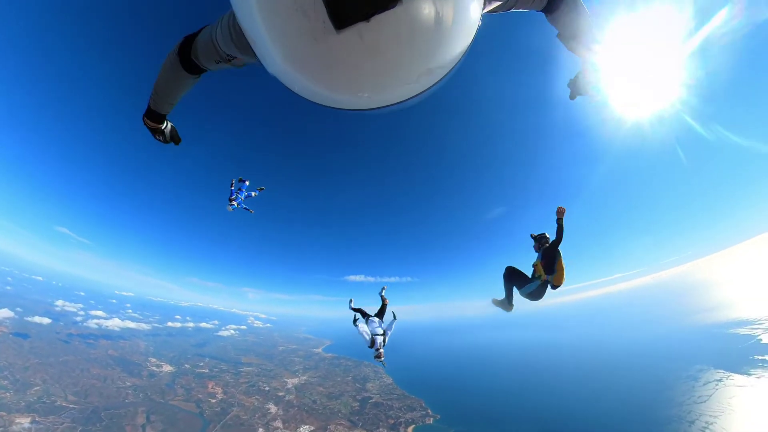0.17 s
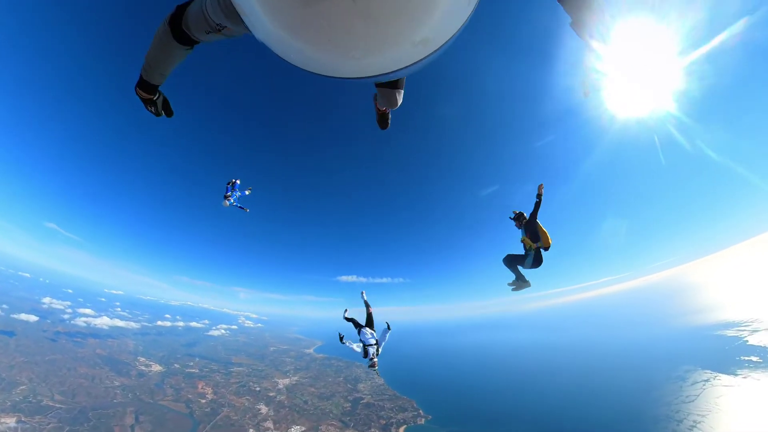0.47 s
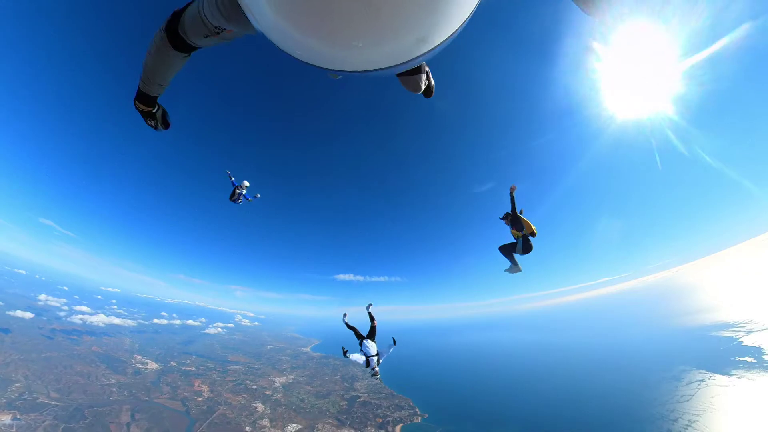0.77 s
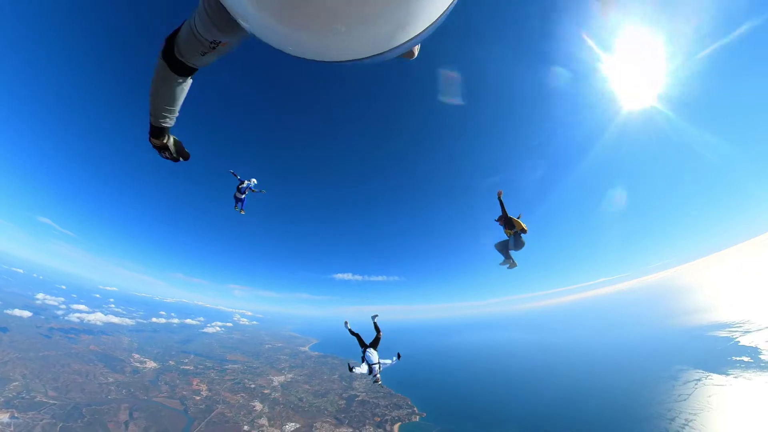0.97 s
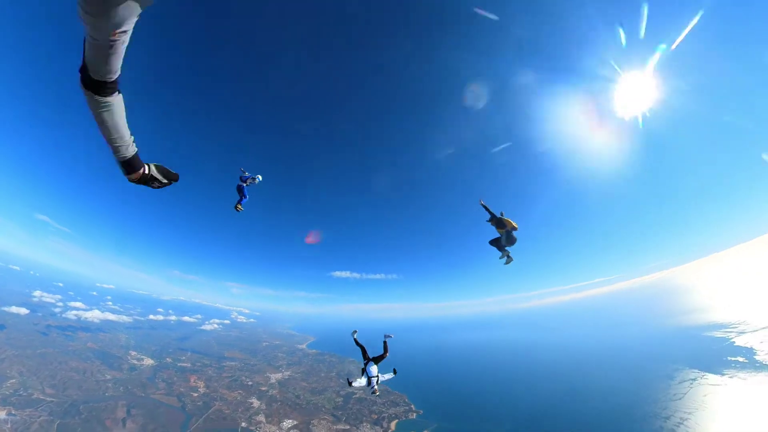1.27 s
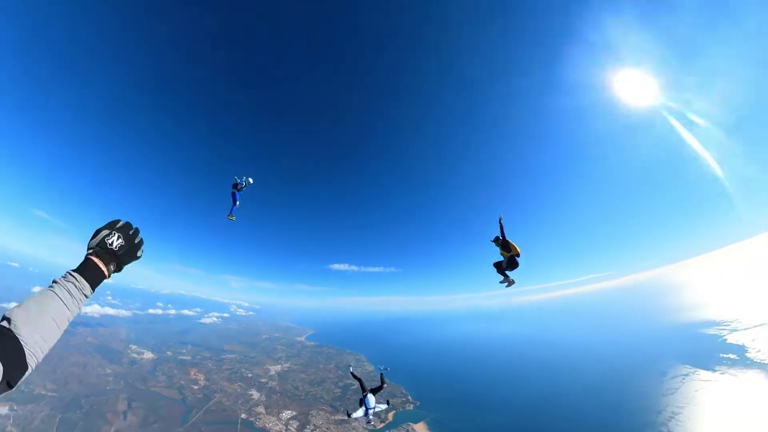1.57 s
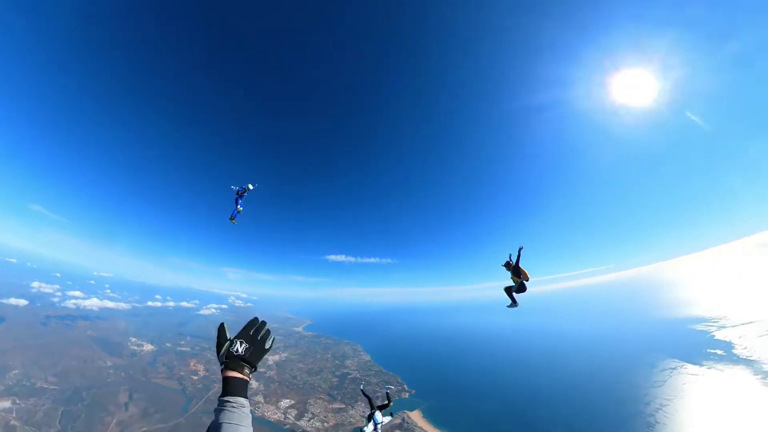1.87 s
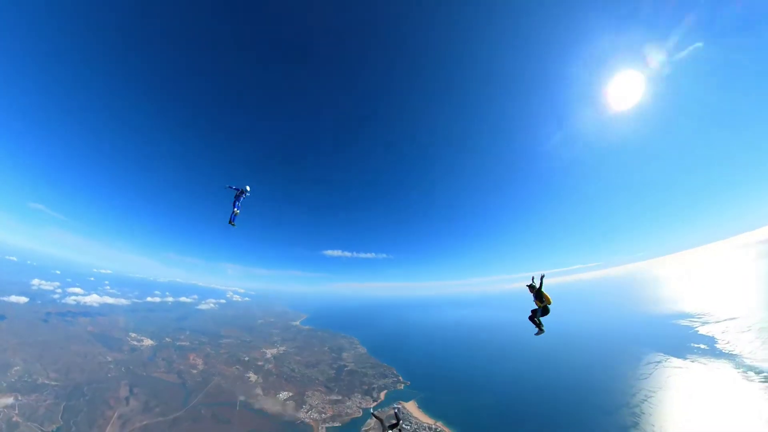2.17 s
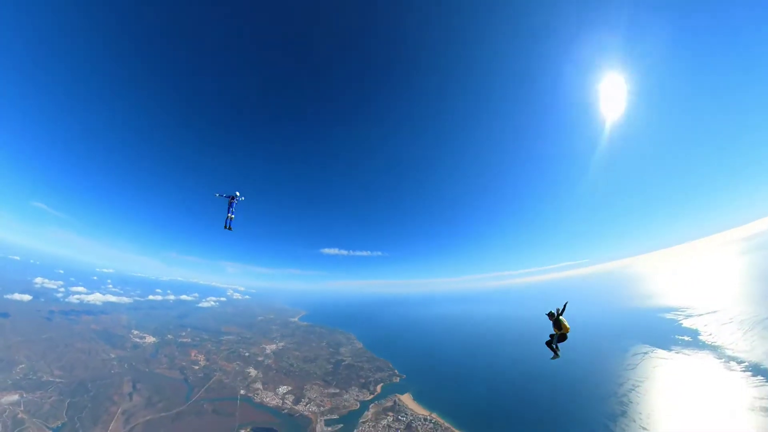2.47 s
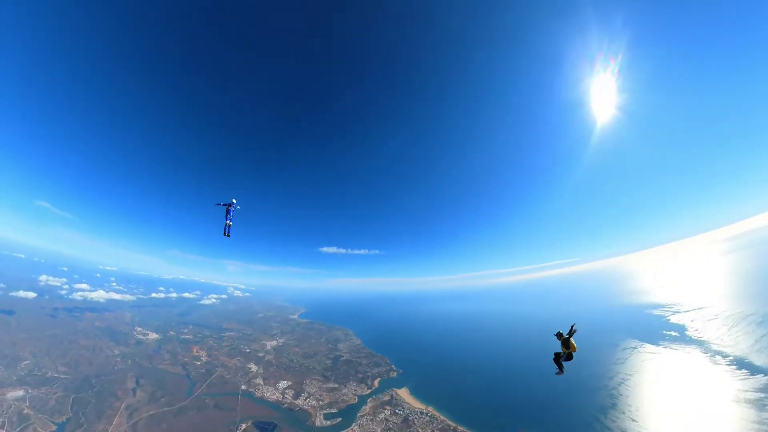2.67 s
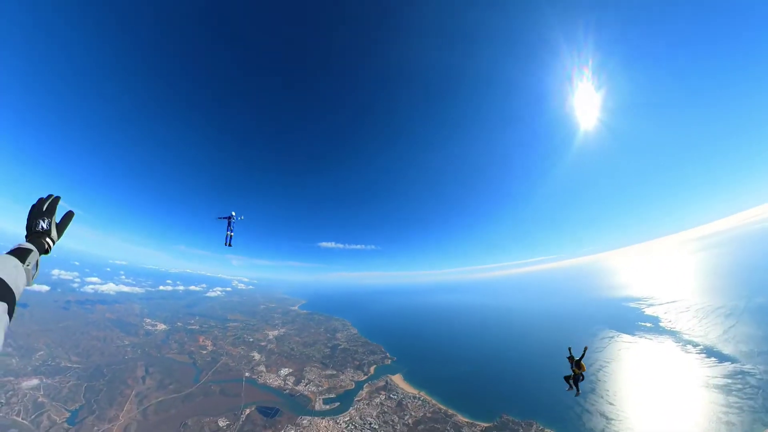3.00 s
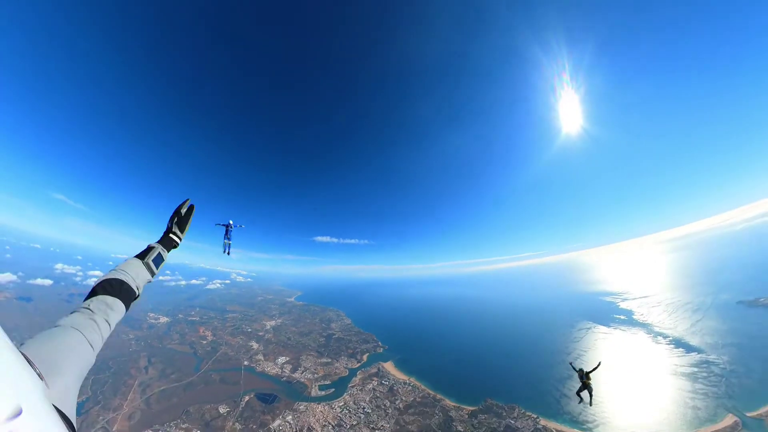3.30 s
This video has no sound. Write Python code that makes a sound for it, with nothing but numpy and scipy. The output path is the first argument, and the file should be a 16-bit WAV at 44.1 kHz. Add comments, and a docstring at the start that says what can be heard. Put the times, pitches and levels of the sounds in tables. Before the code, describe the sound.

Freefall wind overloads a close, body-worn microphone high in open air: a steady rumbling rush, a short gusty hoot, a broken gap of slaps and clicks, then a fluttering roar to the end.

```python
"""Wind in freefall: air tears past a helmet camera's microphone as a low buffet, a roar and a thin hiss.
The rush is four bands of noise following level curves under one shared flutter.
Edges close by add a hoot and a faint whistle: narrow noise around gliding pitches.
As the head turns, the microphone falls into the lee: the rush drops out and lone pressure slaps,
dry cracks and a short port ring stand clear. Then the flow catches again, choppier than before."""
import sys
import numpy as np
from scipy import signal
from scipy.fft import rfft, irfft, next_fast_len
from scipy.io import wavfile
from scipy.ndimage import uniform_filter1d

SR = 44100
rng = np.random.default_rng(int(sys.argv[2]) if len(sys.argv) > 2 else 0)


def store_wav(level_fs):
    """Save 16-bit WAV to argv[1]."""
    pcm = np.round(np.clip(np.atleast_2d(level_fs), -1, 1) * 32767)
    wavfile.write(sys.argv[1], SR, pcm.T.astype(np.int16))


N = 151704
T = np.arange(N) / SR  # seconds

# Wind at the microphone port, before flutter and sputters.
# Each row: time in seconds, then buffet, roar, hiss and top sizzle levels in dB.
FLOW_LEVELS = [(0, -27, -27.5, -44.5, -64), (.36, -26.5, -28, -45.5, -65), (.52, -26, -24, -42, -62.5),
               (.62, -23.5, -26.5, -40, -62), (.81, -22.5, -25.5, -40.5, -62.5), (.835, -30, -30, -45, -69),
               (.86, -22, -24, -38.5, -61), (.93, -30.5, -31.5, -46, -65), (1.13, -25.5, -23, -38.5, -61.5),
               (1.2, -25.5, -26, -51, -73.5), (1.28, -22, -29, -46.5, -71), (1.36, -25, -26, -41, -64),
               (1.47, -25, -25.5, -44, -68), (1.55, -29.5, -26.5, -50, -65.5),
               (1.61, -24.5, -26.5, -59.5, -79.5), (1.632, -49.5, -46, -63, -90),
               (1.665, -44.5, -48.5, -73.5, -87.5), (1.71, -41.5, -43, -66, -89.5),
               (1.80, -29, -27.5, -55.5, -74.5), (1.83, -21, -16.5, -50, -78),
               (1.875, -22, -25.5, -62.5, -90), (1.932, -25, -20.5, -50.5, -79.5),
               (1.944, -29, -33.5, -76.5, -82), (1.97, -61, -58, -79, -88), (2.11, -64, -72, -86.5, -101),
               (2.16, -81.5, -94, -100, -105), (2.28, -61.5, -60, -79, -104), (2.37, -38.5, -49, -77, -94),
               (2.445, -59, -61.5, -76.5, -88), (2.485, -89, -102, -103, -110), (2.53, -80, -79, -99, -106),
               (2.58, -42.5, -46.5, -58, -83.5), (2.615, -27.5, -19, -49, -71.5),
               (2.65, -37.5, -46, -77, -87), (2.722, -55, -59, -72.5, -90), (2.765, -48, -43, -66.5, -84.5),
               (2.78, -31, -27, -48.5, -70), (3.44, -32.5, -26, -46, -69)]
# Depth of the fast flutter of the flow. Each row: time in seconds, depth in dB.
FLUTTER_DEPTH = [(0, 2), (1.6, 3.5), (2.0, 4.5), (2.83, 6), (3.1, 10.5), (3.44, 6)]
# The flow catches (+) or lets go (-) for an instant. Each row: time in seconds, level change in dB.
SPUTTERS = [(2.579, -14), (2.588, 8.5), (2.662, 18), (2.684, 22.5), (2.698, 20.5), (2.742, 14),
            (2.756, 13.5), (2.776, 9), (3.121, -10.5), (3.22, -6), (3.286, -14.5), (3.353, -14.5)]
# Colours of the four parts of the rush. Each row: frequency in Hz, relative density in dB.
BUFFET_COLOUR = [(15, -23.5), (30, -18), (55, -4), (90, -4), (160, -4), (230, -12.5), (400, -44)]
ROAR_COLOUR = [(110, -19), (200, 2.5), (300, 3.5), (450, -2), (650, -9), (900, -20), (1300, -44),
               (2200, -71)]
HISS_COLOUR = [(500, 4), (1000, 5.5), (1500, -4), (2200, -12), (3000, -22), (4500, -38), (7000, -58.5)]
SIZZLE_COLOUR = [(1500, -7.5), (2800, 5), (4000, -1), (5000, -6), (6000, -12), (7000, -24.5), (8200, -39.5),
                 (14000, -46)]
# Hollow hoot of air across an opening. Each row: time in seconds, pitch in Hz, level in dB.
HOOT = [(1.1, 229.4, -38.5), (1.25, 259.7, -22), (1.33, 349.2, -26), (1.40, 270.2, -30.5),
        (1.47, 393.6, -22.5), (1.52, 416, -21.5), (1.555, 289.5, -18), (1.61, 200, -21.5),
        (1.66, 322.3, -56.5), (1.75, 349, -36), (1.835, 459.4, -23), (1.89, 351.5, -27.5), (1.97, 346, -66)]
# Breathy whistle of an edge. Each row: time in seconds, pitch in Hz, level in dB.
WHISTLE = [(0, 3235, -60.5), (.25, 3096, -58.5), (.46, 2826, -61.5), (.7, 3200, -57), (.86, 3186, -64),
           (1.0, 2720, -87), (1.38, 2356, -69.5), (1.54, 5900, -75.5), (1.62, 6120, -88)]
# Eddies slap the diaphragm; the hardest are wide and flat-topped from overload,
# each built from two or three close rows.
# Each row: time in seconds, signed pressure (linear, before the port shapes it).
SLAPS = [(.0022, 0.36), (0.0397, 0.24), (.117, 0.3), (0.1803, 0.32), (.192, .21), (0.2162, 0.37),
         (0.3056, 0.43), (.3495, 0.26), (0.4356, 0.23), (0.5135, 0.25), (0.6584, 0.25), (0.8297, 0.44),
         (0.8553, -0.25), (0.9073, 0.4), (1.0821, .22), (1.17, 0.5), (1.22, 0.45), (1.8294, 0.17),
         (1.9271, -0.19), (2.0095, .3), (2.0351, -0.23), (2.0546, 0.3), (2.095, .007), (2.219, -0.039),
         (2.2379, -.45), (2.2394, -.49), (2.2398, .48), (2.3082, .23), (2.3092, .19), (2.311, .27),
         (2.334, -.29), (2.3354, -.28), (2.3362, .23), (2.352, 0.36), (2.3632, -0.36), (2.3725, -0.073),
         (2.386, 0.4), (2.3995, -0.33), (2.539, 0.032), (2.5589, 0.41), (2.565, -0.39), (2.5897, .2),
         (2.5916, -0.36), (2.597, -0.2), (2.6223, -.22), (2.6276, -.24), (2.6413, 0.26), (2.674, -.08),
         (2.6809, -0.16), (2.7102, -0.062), (2.7361, -0.12), (2.933, -0.35), (2.9712, -0.26),
         (3.0017, 0.36), (3.0327, -0.18), (3.0782, 0.12), (3.103, 0.49), (3.111, -0.092), (3.1549, 0.42),
         (3.1705, -0.38), (3.2105, 0.22), (3.261, -0.44), (3.2989, 0.33), (3.324, -0.42), (3.378, -0.28),
         (3.4179, -0.31)]
# Dry cracks, some close to a slap, some alone. Each row: time in seconds, nominal level in dB, pitch in Hz.
CRACKS = [(1.928, -41, 1900), (2.2217, -45, 3700), (2.2386, -42, 2300), (2.282, -51, 3200),
          (2.3511, -33, 1400), (2.3846, -34.5, 1300), (2.5416, -48.5, 3000), (2.5583, -37.5, 1800)]
# Ringing of the port. Each row: frequency in Hz, level in dB before the decay.
PORT_MODES = [(2950, -39), (5700, -53)]

FLUTTER_HZ, FLUTTER_BIAS, FLUTTER_CREST = 58, 0.23, 0.61  # top rate; offset and upper limit, shares of depth
BUFFET_FLUTTER, HISS_FLUTTER = 1, 0.7  # shares of the flutter in dB; the hiss share also moves the sizzle
EVEN_S = 0.043  # averaging time when levelling the noise
CATCH_S, LULL_S = 0.0024, 0.0065  # half-lengths of a catch and a lull
HOOT_WAVER_HZ, WHISTLE_WAVER_HZ = 52, 350  # reach of the noise either side of the pitch
RISE_MS, TAIL_MS = 0.39, 1.36  # a slap builds fast and lets go more slowly
SNAP_DB, SNAP_WIDTH_MS = -30.5, 0.085  # sharp tip of a slap, relative to its pressure
PORT_LEAK_HZ, PORT_Q = 54, 0.8
CRACK_SPREAD, CRACK_TOP_HZ = 1.28, 6410  # band reaches this factor above and below pitch; common treble limit
RING_AT_S, RING_T60_S = 2.3092, 0.0073  # start, on one slap; time to fall by 60 dB
CUTOFF_HZ = 15850


def from_db(db):
    """Decibels to gain."""
    return 10 ** (np.asarray(db) / 20)


def rms_one(x):
    """Scale to unit power."""
    return x / np.sqrt(np.mean(x ** 2) + 1e-20)


def in_time(rows):
    """Each column of a curve, sample by sample."""
    seconds, *columns = np.transpose(rows)
    return [np.interp(T, seconds, column) for column in columns]


def pulse(at_s, half_s):
    """A smooth bump in time."""
    return np.exp(-((T - at_s) / half_s) ** 2)


def evened(x):
    """Hold the short-term power near one."""
    power = uniform_filter1d(np.abs(x) ** 2, max(int(EVEN_S * SR), 8))
    power = uniform_filter1d(power, max(int(EVEN_S * SR / 2), 8))
    return x / np.sqrt(power + 1e-12)


def noise(colour):
    """Steady noise of the given colour, rolled off beyond both ends of its curve."""
    hz, db = np.transpose(colour)
    size = next_fast_len(N)
    f = np.maximum(np.fft.rfftfreq(size, 1 / SR), 1)
    gain = from_db(np.interp(np.log(f), np.log(hz), db))
    gain = gain * np.minimum(f / hz[0], 1) ** 2 * np.minimum(hz[-1] / f, 1) ** 2
    white = rng.standard_normal(size)
    return evened(irfft(rfft(white) * gain, size)[:N])


def drift(hz):
    """Random wander up to the given rate, with a spread of 1."""
    lowpass = signal.butter(2, hz, fs=SR, output="sos")
    wander = signal.sosfilt(lowpass, rng.standard_normal(N + SR))
    return rms_one(wander[SR:])  # the first second lets the filter settle


def edge_tone(curve, waver_hz):
    """A wind-driven resonance: a narrow band of noise around a gliding pitch."""
    hz, db = in_time(curve)
    inside = (T >= curve[0][0]) & (T <= curve[-1][0])
    sounding = uniform_filter1d(1.0 * inside, size=1000)  # softened ends
    waver = evened(drift(waver_hz) + 1j * drift(waver_hz))
    carrier = np.exp(2j * np.pi * np.cumsum(hz) / SR)
    return sounding * from_db(db) * rms_one(np.real(waver * carrier))


def port_ring():
    """Two short, bright modes of the port, set ringing together at one slap."""
    age = np.maximum(T - RING_AT_S, 0)
    onset = np.tanh(1000 * age / RISE_MS) ** 2
    envelope = from_db(-60 * age / RING_T60_S) * onset
    return envelope * sum(from_db(db) * np.sin(2 * np.pi * hz * age) for hz, db in PORT_MODES)


def cracks():
    """Single clicks, each a broad band around its own pitch."""
    out = np.zeros(N)
    for at_s, db, hz in CRACKS:
        # a lower, narrower band passes less of a click, so it is driven harder
        click = from_db(db) * SR / (2 * hz) * signal.unit_impulse(SR // 100)
        band = signal.butter(2, [hz / CRACK_SPREAD, hz * CRACK_SPREAD], "band", fs=SR, output="sos")
        out[int(at_s * SR):][:len(click)] += signal.sosfilt(band, click)
    treble_limit = signal.butter(10, CRACK_TOP_HZ, fs=SR, output="sos")
    return signal.sosfilt(treble_limit, out + 1e-18)


def slaps():
    """Each eddy snaps and charges the port with pressure that drains away; the leak makes it swing back."""
    spikes, tips = np.zeros((2, N))
    for at_s, pressure in SLAPS:
        centre = int(at_s * SR)
        near = slice(max(centre - SR // 200, 0), centre + SR // 200)
        ms = (T[near] - at_s) * 1000
        spikes[near] += pressure / np.cosh(ms / RISE_MS) ** 2
        tips[near] += pressure / np.cosh(ms / SNAP_WIDTH_MS)
    keep = np.exp(-1000 / (TAIL_MS * SR))  # pressure left after one sample
    charge = TAIL_MS / RISE_MS * signal.lfilter([1 - keep], [1, -keep], spikes + 1e-18)
    leak = 2 * np.pi * PORT_LEAK_HZ
    b, a = signal.bilinear([1, 0, 0], [1, leak / PORT_Q, leak * leak], SR)  # highpass
    return signal.lfilter(b, a, charge + from_db(SNAP_DB) * tips)


def rush():
    """Turbulence in four registers, all shaken by the same flutter, which sags further than it swells."""
    buffet_db, roar_db, hiss_db, sizzle_db = in_time(FLOW_LEVELS)
    depth_db, = in_time(FLUTTER_DEPTH)
    swing_db = depth_db * np.minimum(drift(FLUTTER_HZ) + FLUTTER_BIAS, FLUTTER_CREST)
    sputter_db = sum(db * pulse(at_s, CATCH_S if db > 0 else LULL_S) for at_s, db in SPUTTERS)
    buffet = from_db(buffet_db + BUFFET_FLUTTER * swing_db) * noise(BUFFET_COLOUR)
    roar = from_db(roar_db + swing_db) * noise(ROAR_COLOUR)
    hiss = from_db(hiss_db + HISS_FLUTTER * swing_db) * noise(HISS_COLOUR)
    sizzle = from_db(sizzle_db + HISS_FLUTTER * swing_db) * noise(SIZZLE_COLOUR)
    return from_db(sputter_db) * (buffet + roar + hiss + sizzle)


def scene():
    """All the wind at one microphone."""
    edges = edge_tone(WHISTLE, WHISTLE_WAVER_HZ) + edge_tone(HOOT, HOOT_WAVER_HZ)
    port = port_ring() + cracks() + slaps()
    return (edges + port + rush())[None]


def record(dry):
    """A soft start over two milliseconds and a steep cut of the top."""
    start = np.minimum(T / 0.002, 1) ** 2
    top_cut = signal.cheby2(12, 70, CUTOFF_HZ, fs=SR, output="sos")  # 70 dB down from the cutoff up
    return signal.sosfilt(top_cut, dry * start)


dry = scene()
out = record(dry)
store_wav(out)
```